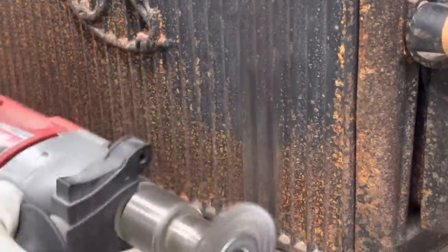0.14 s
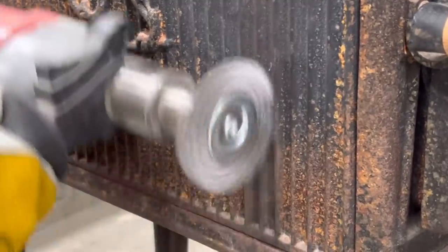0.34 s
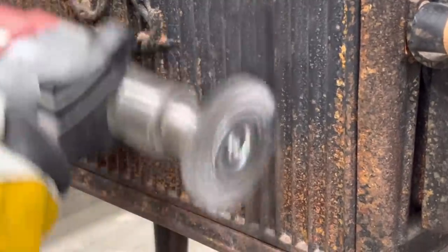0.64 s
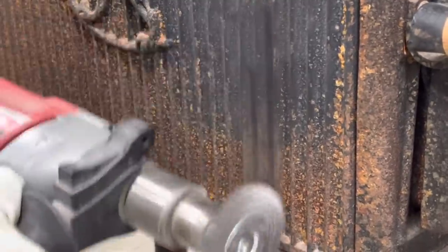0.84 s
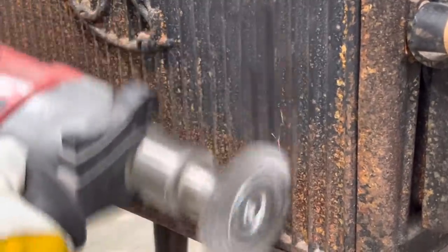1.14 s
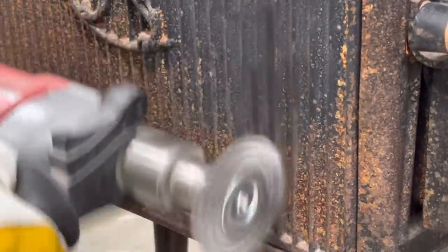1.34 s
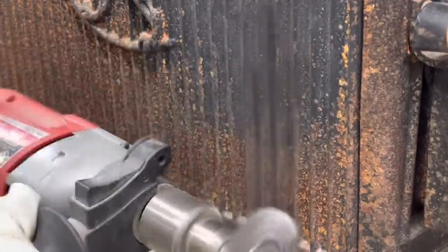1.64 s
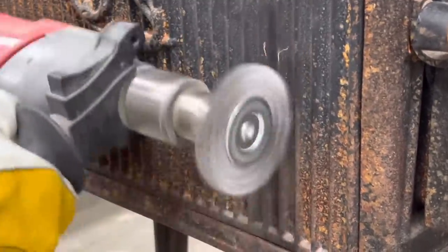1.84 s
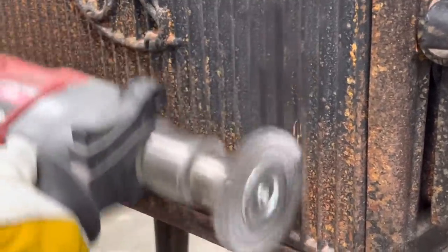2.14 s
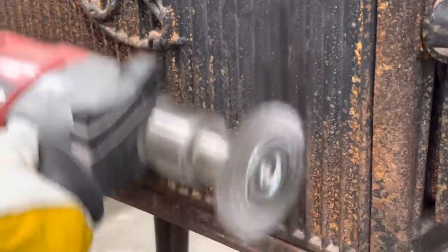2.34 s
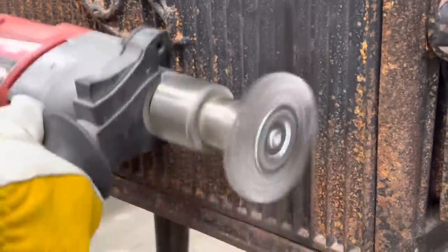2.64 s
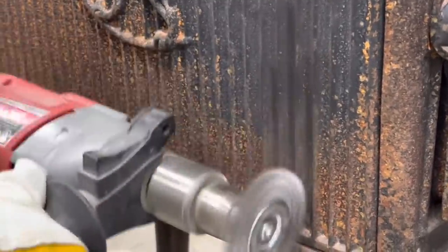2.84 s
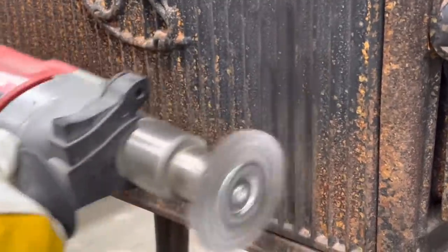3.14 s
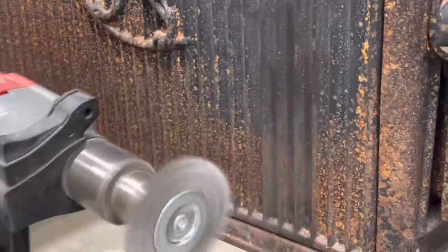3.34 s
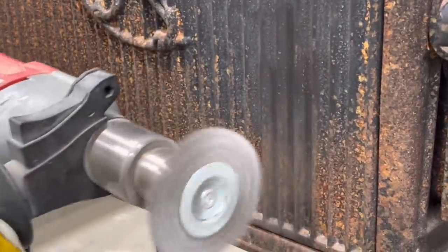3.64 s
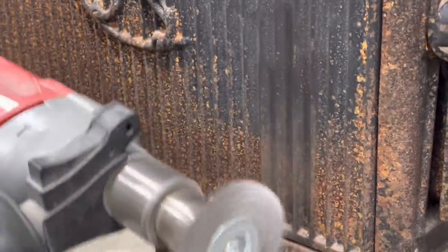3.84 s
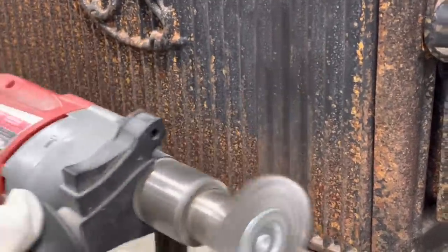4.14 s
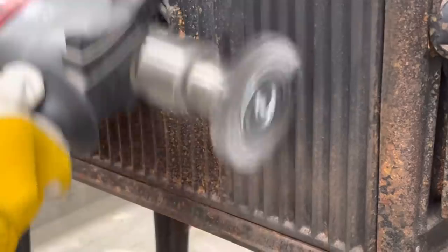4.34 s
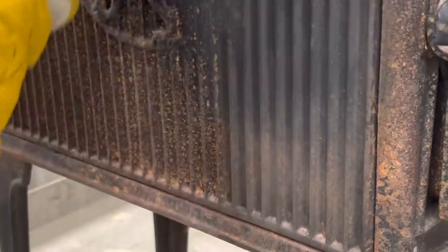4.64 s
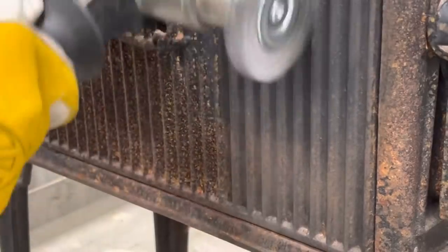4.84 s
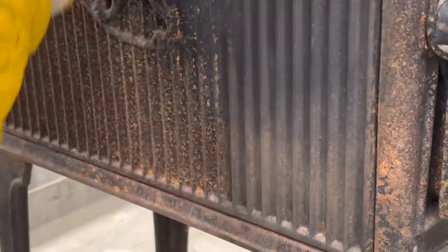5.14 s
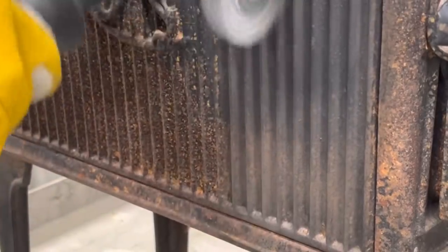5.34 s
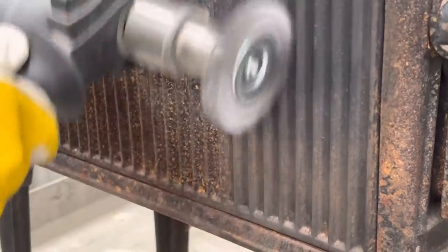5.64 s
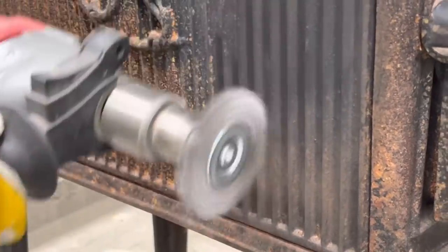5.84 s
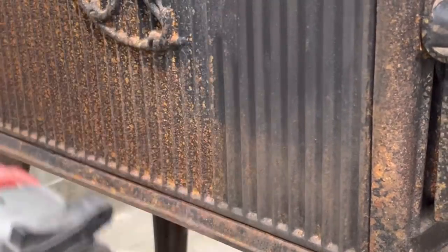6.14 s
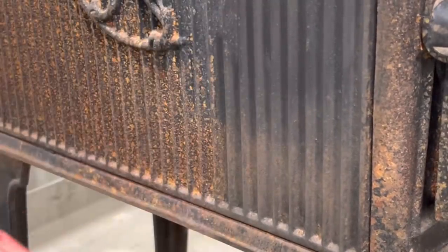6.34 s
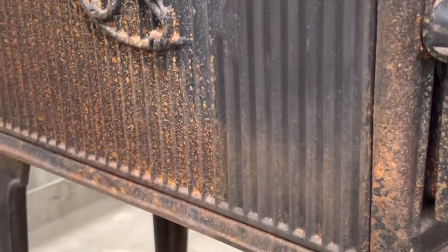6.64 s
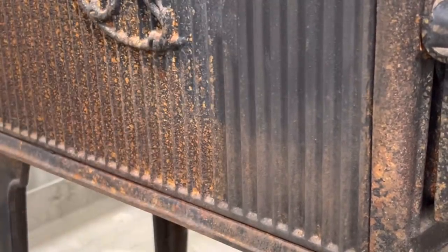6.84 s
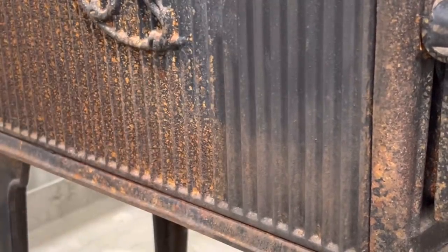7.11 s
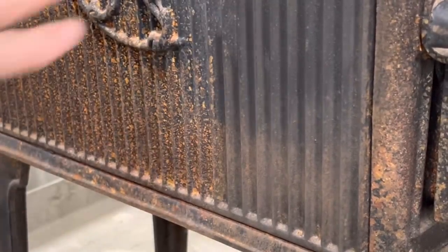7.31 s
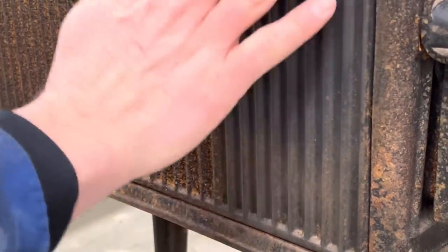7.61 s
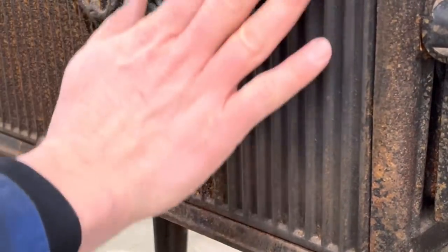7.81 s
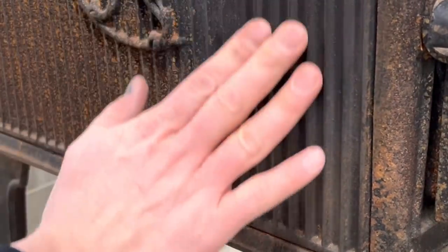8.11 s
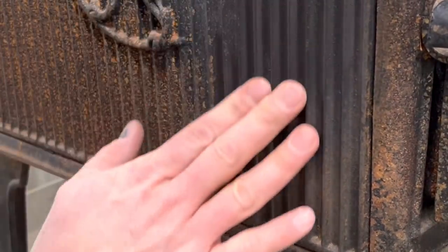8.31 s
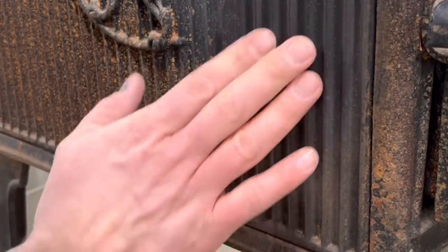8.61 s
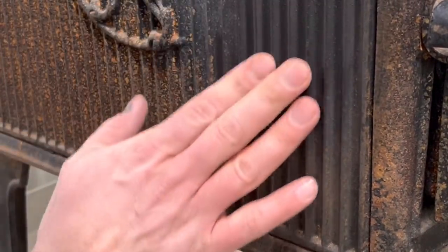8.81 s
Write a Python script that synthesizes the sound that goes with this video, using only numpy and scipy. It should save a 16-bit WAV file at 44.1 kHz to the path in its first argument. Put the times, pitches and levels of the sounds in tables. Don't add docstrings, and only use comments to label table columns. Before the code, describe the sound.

Close in a workshop, a mains drill drives a wire brush over ribbed cast iron: steady gear whine, rattling housing, fan air and bright wire hiss shifting with strokes. It lifts and speeds up, presses on again at a new angle after a short dip, then chirps and coasts down. Finally a hand rubs the iron quietly over low hum.

```python
import sys
import numpy as np
from scipy import signal
from scipy.fft import rfft, irfft, next_fast_len
from scipy.io import wavfile
from scipy.ndimage import uniform_filter1d, map_coordinates

SR = 44100
rng = np.random.default_rng(int(sys.argv[2]) if len(sys.argv) > 2 else 0)


def to_linear_factor(level_db):
    exponent = np.asarray(level_db, float) / 20
    return 10 ** exponent


def materialize(psi):
    bounded = np.clip(np.atleast_2d(psi).T, -1, 1)
    quanta = np.round(bounded * 32767).astype(np.int16)
    wavfile.write(sys.argv[1], SR, quanta)


N = 395577
SECONDS = np.arange(N) / SR

# time in seconds, fade in seconds.
CUTS = [
    (4.1965, .034),
    (7.233, .04),
]
# time in seconds, load of the brush on the iron (0-1), how squarely the drill faces the
# phone in dB.
GRIP = [(0, .7, -2), (.25, .95, -1), (1.3, .85, 0), (1.7, .9, 1), (1.85, 1, 0), (2.2, 1, -1), (2.4, .8, 0),
        (2.85, .75, 1), (3.2, .55, -8), (3.42, 0, -7), (3.6, 0, -3), (4.18, .1, -2.5), (4.2, 1, -4),
        (4.42, .95, -2), (4.6, 1, -8), (5.42, 1, -10), (5.58, 1, -3), (5.66, .4, -3)]
FULL_SPEED, STOP_SPEED = 450, 300
RELEASE_S = 5.72


def unit(x):
    return x / np.sqrt(np.mean(x ** 2) + 1e-20)


def along(points, hz):
    f, v = np.transpose(points)
    return np.interp(np.log(hz + 1), np.log(f + 1), v)


def curves(table):
    s, *columns = np.transpose(table)
    return [np.interp(SECONDS, s, column) for column in columns]


def wobble(rate):
    return map_coordinates(rng.standard_normal(int(N * rate / SR) + 4), [np.arange(N) * rate / SR])


def smooth(x, high, long):
    return uniform_filter1d(uniform_filter1d(x, size=high, axis=0), size=long, axis=1)


def filtered(x, response):
    m = next_fast_len(N + 8192)
    return irfft(rfft(x, m) * response(np.fft.rfftfreq(m, 1 / SR)), m)[..., :N]


def patchy(patchy_db, specks_db=2.5):
    z = signal.stft(rng.standard_normal((2, N)), nperseg=1024)[2]
    broad = unit(smooth(rng.standard_normal(z.shape[1:]), 12, 6))
    specks = unit(smooth(rng.standard_normal(z.shape[1:]), 2, 3))
    gain = to_linear_factor(patchy_db * broad + specks_db * specks)
    return signal.istft(z * gain, nperseg=1024)[1][:, :N]


def shaped(pair, spectrum):
    return unit(filtered(pair, lambda hz: to_linear_factor(along(spectrum, hz))))


def ringing(pair, peaks):
    def response(f):
        return sum(to_linear_factor(db) * 1j * f * w / (c * c - f * f + 1j * f * w) for c, w, db in peaks)
    return unit(filtered(pair, response))


def ports(pair, alike):
    def response(hz):
        turn = np.arccos(np.clip(along(alike, hz), -1, 1)) / 2
        return np.array([np.cos(turn), np.sin(turn)])
    mid, side = filtered(pair, response)
    return np.array([mid + side, mid - side])


def room_hum():
    room_db = [-79, -70.3]
    # frequency in Hz, level in dB per Hz.
    hum_colour = [(24, -31), (40, -5), (80, -6.5), (188, -14), (247, -14.5), (329, -11), (383, -9.5),
                  (401, -21.5), (481, -13.5), (503, -27), (527, -17.5), (923, -28.5), (1500, -35.5),
                  (1950, -61), (3300, -120)]
    level_db = np.where(SECONDS < CUTS[-1][0], *room_db) + 4.5
    return to_linear_factor(level_db) * shaped(patchy(patchy_db=-0.8, specks_db=0.2), hum_colour)


def rubbing():
    # time in seconds, effort in dB.
    effort = [(7.3, 7), (7.5, -2), (7.75, 0), (7.95, 3), (8.37, 1.5), (8.44, 5), (8.62, -3.5), (8.8, 1),
              (8.97, 5)]
    # level in dB, share of the rubbing effort.
    rub_layers = [
        (-82, 0.4),
        (-94.5, .5),
        (-94.5, 1),
    ]
    since = SECONDS - CUTS[-1][0]
    effort_db = curves(effort)[0]
    skin_db, sleeve_db, grit_db = [db + share * effort_db - 60 * (since < 0) for db, share in rub_layers]
    ago = np.maximum(SECONDS - 8.41, 0)
    pat_db = 4 * np.minimum(ago / .03, 1) * np.exp(-(ago / .08) ** 2 / 2)
    swish_db = 14 * np.exp(-((since - .08) / .09) ** 2 / 2)
    return skin_db + pat_db, sleeve_db + swish_db, grit_db


def hand():
    # frequency in Hz, level in dB per Hz.
    skin_colour = [(400, -28.5), (800, 3.5), (1700, -1.5), (2500, -2.5), (3200, -8.5), (5000, -13),
                   (7000, -29)]
    sleeve_colour = [(4500, -30), (5600, -6), (6100, 0.5), (6600, -5), (7500, -32.5)]
    grit_colour = [(3000, -20), (4500, 0.5), (7000, 0), (8500, -4.5), (10000, -10), (12000, -13),
                   (13000, -30), (14000, -78)]
    skin_db, sleeve_db, grit_db = rubbing()
    rub = to_linear_factor(skin_db + 2.5) * shaped(patchy(patchy_db=1.7, specks_db=2.0), skin_colour)
    rub += to_linear_factor(sleeve_db - 3.0) * shaped(patchy(patchy_db=5.5), sleeve_colour)
    return rub + to_linear_factor(grit_db + 5.5) * shaped(patchy(patchy_db=0.5), grit_colour)


def workshop():
    # frequency in Hz, left-right likeness.
    far_likeness = [(80, .995), (170, 0.92), (260, 0.89), (500, .56), (900, .3), (1300, 0.37), (2100, 1),
                    (3400, .88), (4500, 0.97), (8600, 0.96), (9300, .7), (12000, .55)]
    return ports(room_hum() + hand(), far_likeness) * to_linear_factor([[.5], [-.5]])


def bumps():
    # start in seconds, frequency in Hz, peak in dB, rise in seconds, 60 dB decay in seconds.
    pushes = [
        (3.7, 165, -23, 0.006, 0.038),
        (3.735, 86.4, -35, 0.016, 0.16),
    ]
    out = np.zeros(N)
    for s, hz, db, rise, t60 in pushes:
        ago = np.maximum(SECONDS - s, 0)
        envelope = to_linear_factor(db - 60 * ago / t60) * (1 - np.exp(-ago / rise))
        out += envelope * np.sin(2 * np.pi * hz * ago)
    return out


def rotor():
    # time in seconds, rotor speed in turns per second.
    driven_speed = [(0.0, 470.1), (0.3, 472.8), (1.0, 477.3), (1.2, 474), (1.5, 474.6), (1.95, 469.2),
                    (2.4, 469.5), (2.8, 472.2), (3.15, 484.5), (3.7, 492.8), (4.19, 495.0), (4.2, 460.2),
                    (4.45, 460.2), (4.65, 463), (5.0, 464.2), (5.25, 460.6), (5.6, 456.8), (5.72, 467.8)]
    friction, drag = 84, .283
    since = np.maximum(SECONDS - RELEASE_S, 0)
    return (curves(driven_speed)[0] + friction / drag) * np.exp(-drag * since) - friction / drag


def slowing(speed):
    return 20 * np.log10(np.minimum(speed / FULL_SPEED, 1))


def layers(speed):
    # driven level in dB, power of speed, share of the stroke swing.
    noise_layers = [
        (-41, 3.03, 0.88),
        (-40.5, 1.17, -0.17),
        (-40, 1.85, -0.3),
    ]
    # time in seconds, swing in dB.
    strokes = [(.02, 3), (.38, 1), (.68, 2.5), (.95, 2), (1.32, 3), (1.65, 1.5), (1.89, 1.5), (2.22, -2),
               (2.33, 2.5), (2.66, 1.5), (3.04, 2.5), (3.32, -0.5), (3.56, 0.5), (4.05, 1.5), (4.39, 1),
               (4.61, -1.5), (4.94, 0.5), (5.1, -6), (5.27, 0), (5.44, -3), (5.6, 2), (5.82, 1)]
    stroke_s = .07
    swing = sum(db * np.exp(-.5 * ((SECONDS - s) / stroke_s) ** 2) for s, db in strokes)
    slow_db = slowing(speed)
    housing_db, air_db, bristle_db = [db + power * slow_db + share * swing
                                      for db, power, share in noise_layers]
    free = (1 - np.clip(curves(GRIP)[0], 0, 1)) * (SECONDS < CUTS[0][0])
    return housing_db, air_db, bristle_db + 1 * free


def tone_levels(speed):
    # loaded dB, running free dB, coasting dB, power of speed while coasting.
    family_levels = [
        (-46, -46, -47.5, 4.8),
        (-49.5, -59, -61, 2.5),
        (-47.3, -70, -56, 2.5),
        (-55, -54, -59, 2),
        (-57.5, -59, -60, 1.5),
    ]
    load, facing_db = curves(GRIP)
    load = np.clip(load, 0, 1)
    released = np.clip((SECONDS - RELEASE_S) / 0.13, 0, 1)
    slow_db = slowing(speed)
    levels = []
    for loaded, free, coast, power in family_levels:
        driven_db = free + load * (loaded - free)
        levels.append((1 - released) * driven_db + released * coast + power * slow_db)
    unbalance_db, second_db, pinion_db, slots_db, overtone_db = levels
    flicker_db = 3 * wobble(60)
    for s, peak_db in [(5.68, 9.5), (5.795, 10.5)]:
        overtone_db = overtone_db + (peak_db + flicker_db) * np.exp(-.5 * ((SECONDS - s) / .03) ** 2)
    return unbalance_db + facing_db * (1 - released), second_db, pinion_db, slots_db, overtone_db


def family(orders, speed, flutter_db, blur=.45):
    angle = 2 * np.pi * np.cumsum(speed) / SR
    tones = np.zeros(N)
    for k, db in orders:
        heard = k * speed < 16000
        level = np.sqrt(2) * to_linear_factor(db + flutter_db * wobble(12))
        shake = .04 * k ** .9 * wobble(30) + blur * wobble(14)
        tones += heard * level * np.sin(k * angle + shake)
    return tones


def whine(speed, coasting):
    # multiple of rotor speed, level in dB against the family.
    second_gear = [(14 / 3, 0), (17 / 3, -8), (31 / 3, -10)]
    pinion = [(6, -8), (7, 0), (8, -6), (15, -11), (16, -12)]
    slots = [(4, -5), (11, -1), (12, 1), (13, -1), (14, -8)]
    commutator = [(24, 3), (36, -2), (39, 3), (48, 0), (60, -5), (72, 2)]
    # frequency in Hz, level in dB.
    holders = [(4500, -22), (5900, -9), (6450, 4), (6900, -10), (7900, -8), (8900, -2), (10200, -6),
               (11400, -1), (12000, -11), (13200, -17), (14000, -7), (15000, -4), (15800, -9)]
    unbalance_db, second_db, pinion_db, slots_db, overtone_db = tone_levels(speed)
    housing_db, _, bristle_db = layers(speed)
    layshaft_db = housing_db - 12 + 5.5 * coasting - 24 * coasting ** 3
    speed = speed * (1 + .0005 * wobble(25))
    tones = to_linear_factor(unbalance_db - 2) * family([(1, 0)], speed, flutter_db=1.4)
    tones += to_linear_factor(second_db - .5) * family(second_gear, speed, flutter_db=2)
    tones += to_linear_factor(pinion_db + .3) * family(pinion, speed, flutter_db=1.1)
    tones += to_linear_factor(slots_db - 1) * family(slots, speed, flutter_db=3)
    overtone = family([(28 / 3, 0)], speed, flutter_db=1.2, blur=1.1)
    tones += to_linear_factor(overtone_db + .5 - 10 * coasting) * overtone
    tones += to_linear_factor(layshaft_db) * family([(5 / 3, 0)], speed, flutter_db=2, blur=3)
    ticks = filtered(family(commutator, speed, flutter_db=1.8), lambda hz: to_linear_factor(along(holders, hz)))
    return tones + to_linear_factor(bristle_db - 23 + 9.5 * coasting) * ticks


def housing(on, off):
    # frequency in Hz, width in Hz, level in dB.
    first_angle = [(370.3, 3.8, -15.5), (566, 26, -11.5), (845, 96, 0), (1034, 80, -7.5), (1425, 74, -7)]
    new_angle = [(375, 8.6, -17), (555, 46, -15.5), (802, 45, 2), (904, 99, -0.5), (1004, 78, -4),
                 (1400, 130, -13)]
    coast_peaks = [(947, 65, 4), (1570, 51, -10)]
    before = ringing(patchy(patchy_db=.5, specks_db=.8), first_angle)
    after = ringing(patchy(patchy_db=.5, specks_db=.8), new_angle)
    held = np.where(SECONDS > CUTS[0][0], after, before)
    return on * held + to_linear_factor(-4.0) * off * ringing(patchy(patchy_db=2.0), coast_peaks)


def fan_air(on, off):
    # frequency in Hz, level in dB per Hz.
    driven_air = [(40, -37), (120, -22.5), (260, -3.5), (430, -3), (600, 0), (1200, 3.5), (1700, 0.5),
                  (2500, 4.5), (3000, 2), (3400, -2), (4200, -13.5), (6000, -24.5), (9000, -57.5)]
    coast_air = [(40, -47.5), (170, -11.5), (430, -5.5), (700, -2), (1200, -8.5), (1700, -3), (2300, 0.5),
                 (2700, 4.5), (3100, -3.5), (3900, -5.5), (6000, -33), (9000, -61.5)]
    driven = shaped(patchy(patchy_db=-0.78), driven_air)
    return on * driven + to_linear_factor(-3.0) * off * shaped(patchy(patchy_db=1.0), coast_air)


def strikes(colour):
    clicks = rng.standard_normal((2, N)) * (rng.random((2, N)) < .12)
    return shaped(patchy(patchy_db=0.5) + .6 * unit(clicks), colour)


def bristles(on, off):
    # frequency in Hz, level in dB per Hz.
    driven_wire = [(1500, -40), (3300, -7.5), (4200, -1.5), (5200, 1), (6500, -1.5), (7800, -3),
                   (9000, -1.5), (11200, -0.5), (12000, -5), (13100, -20.5), (14000, -15), (15000, -8),
                   (15700, -9.5)]
    coast_wire = [(1500, -35), (3300, -16), (4000, -5.5), (5100, 4), (6200, -5), (8800, -2.5),
                  (10000, -6.5), (11200, -7.5), (12000, -14), (13100, -24), (14000, -22), (15000, -15),
                  (15700, -18)]
    return on * strikes(driven_wire) + to_linear_factor(-3.5) * off * strikes(coast_wire)


def drill():
    # frequency in Hz, left-right likeness.
    near_likeness = [(100, .98), (300, 1), (520, 0.89), (800, 0.95), (1300, 0.96), (2200, 0.97),
                     (2700, 0.98), (3200, 0.88), (3900, 0.99), (4500, .99)]
    # frequency in Hz, left over right in dB.
    left_lean = [(90, 0), (260, 1), (430, 7), (700, 1), (1000, 1.5), (1800, 3), (2100, 0)]
    speed = rotor()
    coasting = np.clip((FULL_SPEED - speed) / (FULL_SPEED - STOP_SPEED), 0, 1)
    on, off = np.sqrt(1 - coasting), np.sqrt(coasting)
    housing_db, air_db, bristle_db = layers(speed)
    pressure_db = .5 * wobble(16)
    noise = to_linear_factor(housing_db + 1.0 + pressure_db) * housing(on, off)
    noise += to_linear_factor(air_db + 1.5 + pressure_db) * fan_air(on, off)
    noise += to_linear_factor(bristle_db + 3.5 + pressure_db) * bristles(on, off)
    noise[0] += whine(speed, coasting)
    sides = np.array([[.5], [-.5]])
    return filtered(ports(noise, near_likeness), lambda hz: to_linear_factor(along(left_lean, hz) * sides))


def scene():
    mix = drill() * (SECONDS < CUTS[-1][0]) + bumps() + workshop()
    for s, fade in CUTS:
        mix = mix * np.clip(abs(SECONDS - s) / fade, .04, 1) ** 0.93
    return mix


def low_pass(x):
    return signal.sosfilt(signal.butter(12, 17120, fs=SR, output="sos"), x)


def record(dry):
    # frequency in Hz, half turns by which left leads.
    left_lead = [(90, 0), (430, .18), (600, -.03), (800, 0), (2750, 0), (3250, .1), (3900, 0), (8700, 0),
                 (9300, -.62), (10250, -1), (11900, -2), (13000, -2), (13100, -3), (14250, -3), (15350, -4)]
    hz, t, z = signal.stft(dry, SR, nperseg=1024)
    hz = hz[:, None]
    drift = 1 + .009 * unit(uniform_filter1d(rng.standard_normal(len(t)), size=5))
    turn = .5 * np.pi * along(left_lead, hz * drift)
    tiles = unit(smooth(rng.standard_normal(turn.shape), 7, 4))
    turn = turn + .33 * tiles * np.sin(2 * turn)
    left, right = z[0] * np.exp(1j * turn), z[1] * np.exp(-1j * turn)
    mid, side = (left + right) / 2, (left - right) / 2
    mid_power, side_power = smooth(abs(mid) ** 2, 9, 5), smooth(abs(side) ** 2, 9, 5)
    blocks = np.kron(rng.standard_normal((65, len(t) // 4 + 1)), np.ones((8, 4)))[:len(hz), :len(t)]
    mood = unit(uniform_filter1d(rng.standard_normal(len(t)), size=9))
    weak_side = (hz > 700) & (side_power < mid_power * to_linear_factor(2 * (-16 + 1.5 * blocks + 2 * mood)))
    weak_mid = (hz > 8000) & (abs(np.cos(turn)) < .24 + .08 * blocks)
    faint = (abs(hz - 13050) < 500) & (blocks + mood > 1.0)
    mid, side = mid * ~weak_mid, side * ~weak_side
    wet = np.array([mid + side, mid - side]) * ~faint * (hz < 15750)
    return low_pass(signal.istft(wet, SR, nperseg=1024)[1][:, :N])


dry = scene()
out = record(dry)
materialize(out)
```